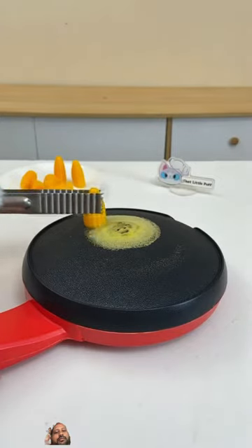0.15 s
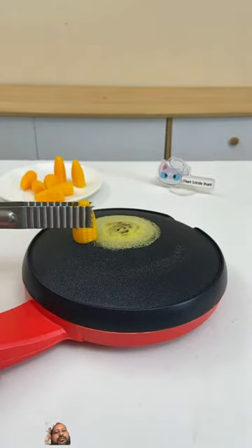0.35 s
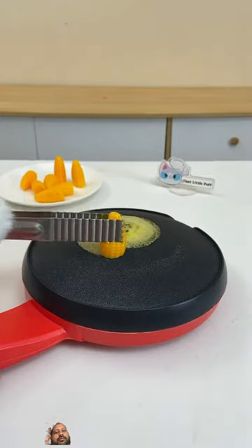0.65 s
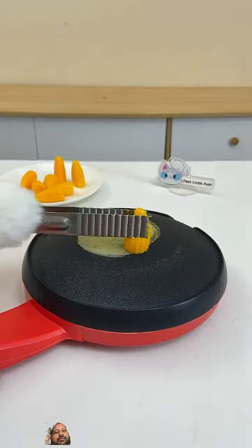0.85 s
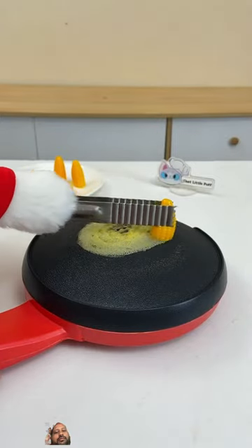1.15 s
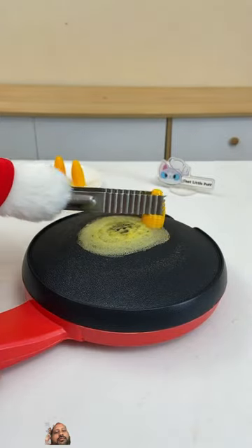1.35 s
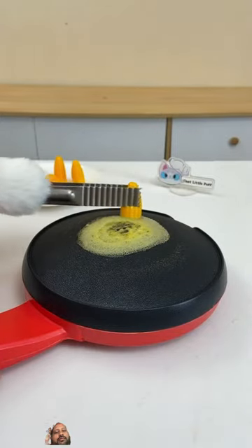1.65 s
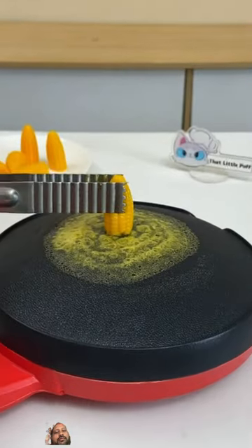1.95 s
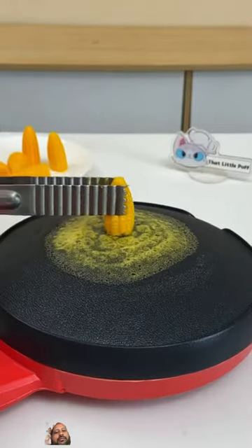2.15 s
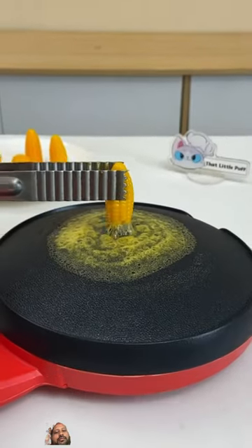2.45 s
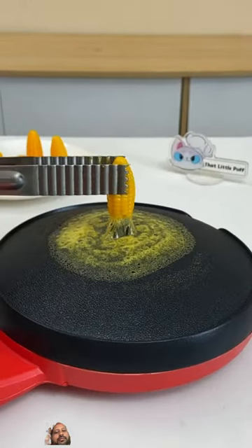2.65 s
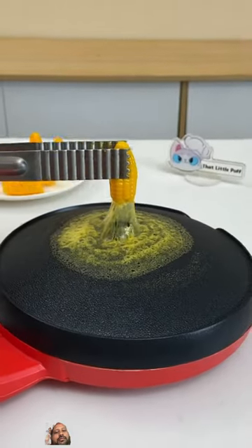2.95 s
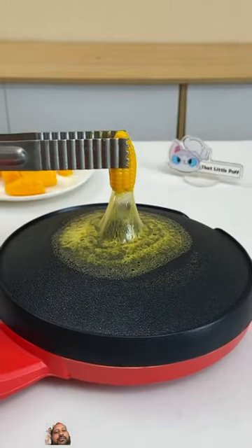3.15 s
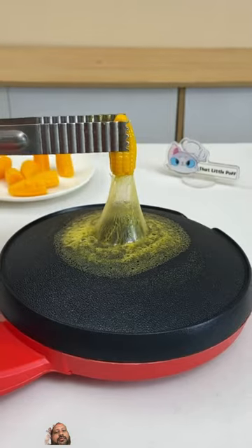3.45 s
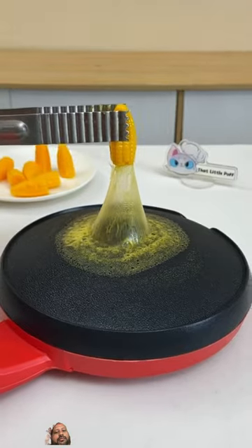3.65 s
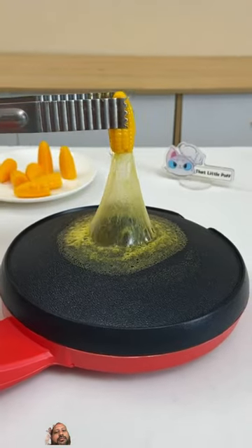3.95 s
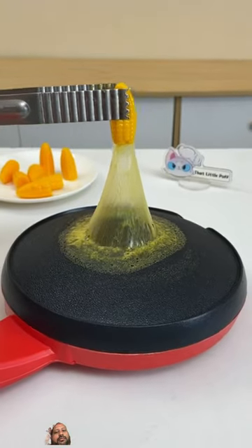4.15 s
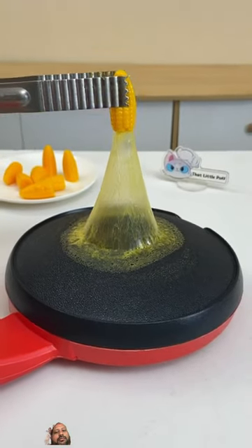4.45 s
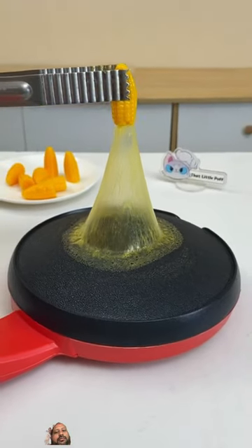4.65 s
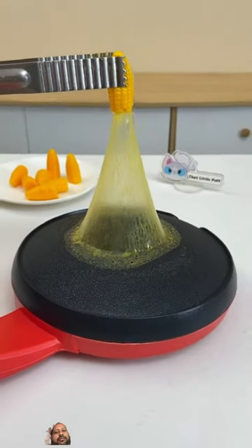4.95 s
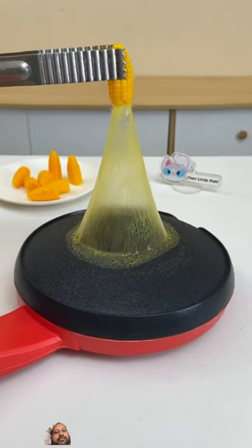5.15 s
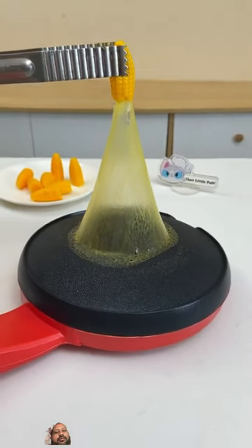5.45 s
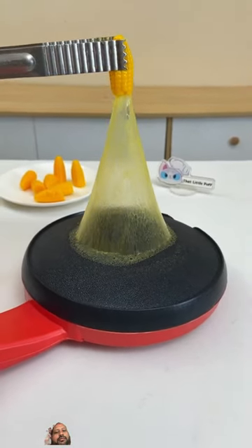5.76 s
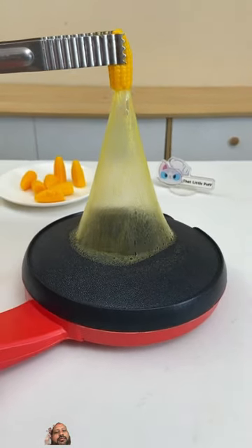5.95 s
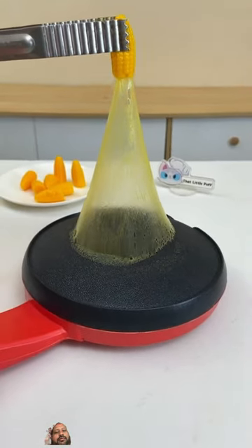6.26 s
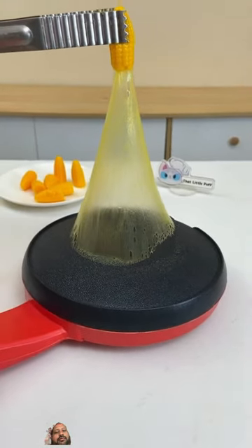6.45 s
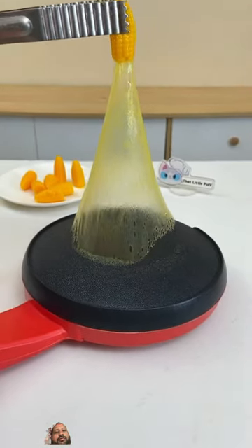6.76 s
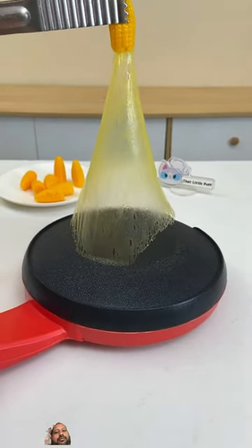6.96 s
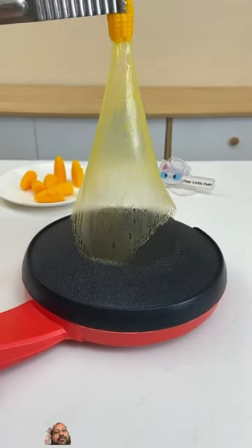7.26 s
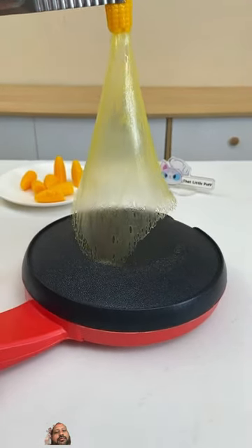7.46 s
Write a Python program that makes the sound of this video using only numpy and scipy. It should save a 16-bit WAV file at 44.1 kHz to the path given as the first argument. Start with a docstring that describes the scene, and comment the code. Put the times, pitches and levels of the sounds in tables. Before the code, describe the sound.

Close over a hot electric plate in a kitchen, thin batter hisses brightly, full of small popping bubbles and early steam, easing as it dries, then stops dead. After a brief silence come faint room air, a soft wet plop and one hard snap. The cooked film then peels away in quiet, dry, rustling surges with single sharp cracks, a faint squeak and a short low hum near the end.

```python
"""In a kitchen, close over a hot electric plate: thin batter hisses, full of bursting bubbles, and stops dead.
After a moment of silence come room air, a soft plop and a sharp snap. Then the cooked film is pulled up:
it peels in rustling surges of tiny fractures, with single dry cracks; its hollow note sinks as the cone grows.
Noise grains, filtered to each colour, make hiss and rustle; struck resonances make bubbles, snap and flaps.
The stretched skin squeaks once; late on, a double tug sets it humming. A faint floor lies underneath."""
import sys
import numpy as np
from scipy import signal
from scipy.fft import rfft, irfft
from scipy.io import wavfile
from scipy.ndimage import uniform_filter1d, map_coordinates

SR = 44100
rng = np.random.default_rng(int(sys.argv[2]) if len(sys.argv) > 2 else 0)


def dump(signal):
    """Clip the signal to [-1, 1] and save it as 16-bit WAV at the path in sys.argv[1]."""
    limited = np.clip(np.atleast_2d(signal).T, -1, 1)
    pcm = np.round(limited * 32767).astype(np.int16)
    wavfile.write(sys.argv[1], SR, pcm)


N = 335160
TIME = np.arange(N) / SR

# Colour of the frying batter: f/Hz, level/dB per Hz
FRY_SPECTRUM = [(24, -76.5), (40, -17.5), (75, -17), (115, -18), (171, -9.5), (354, -16), (942, -18),
                (3140, -3.5), (9450, -5), (14500, -15), (16000, -28.5)]
# Loudest single cracks of the film: t/s, level/dB (over 2 ms), fizz re level/dB, body re level/dB
CRACKS = [(2.492, -46, -8, -19), (2.5741, -42, 16.5, -11.5), (2.6215, -58, 18, -12),
          (2.6366, -23.5, 4.5, -19), (2.7786, -47, 13.5, -8.5), (2.787, -45, 13.5, -13),
          (2.8088, -47, 9, -7), (2.8149, -47, 11, -12), (3.086, -46, 2, -6), (3.103, -38, 7.5, -24),
          (3.1074, -45, 7, -25), (3.1466, -40, 6, -25), (3.1605, -32, 5, -31), (3.168, -23, -1.5, -15),
          (3.3705, -30, 0.5, -20), (3.3745, -30.5, -0.5, -24), (3.4578, -33, 3, -19), (3.461, -36, 0, -25),
          (3.465, -32, 1, -34), (3.4851, -39, 7, -25), (3.4915, -38, 8, -22), (3.6113, -39.5, 5, -31),
          (3.619, -37, 3, -35), (3.6338, -44, 0, -25), (3.7095, -42, 1, -28), (3.7222, -40, 3.5, -28),
          (3.7484, -36, 2, -26), (3.8135, -31.5, -3, -23), (3.8196, -39, 1, -22), (3.829, -42, 5.5, -28),
          (3.9698, -40, 5.5, -19.5), (3.9853, -47, 0, -12), (4.109, -41.5, 2, -22),
          (4.1367, -35.5, -9, -6.5), (4.3, -42, 1.5, -24), (4.936, -29.5, 1, -23), (5.6309, -44, -2, -19),
          (5.6538, -38.5, 0, -19), (5.6815, -37.5, -16, -6.5), (5.7304, -40, -5, -37),
          (5.743, -44, -3, -25), (5.76, -39.5, -15, -31), (5.821, -44.5, -1, -28), (5.843, -42, 2.5, -21),
          (5.8659, -35.5, -12, -27), (5.9502, -47, -9, -25), (6.1426, -45, 1, -28), (6.2271, -37, -3, -21),
          (6.353, -38, -0.5, -22), (6.387, -33.5, -5, -16), (6.4807, -29.5, 2.5, -21),
          (6.517, -33, -7, -24), (6.5476, -39, -5, -22), (6.8232, -49, 8, -13.5), (6.915, -38, 0.5, -18),
          (6.932, -40.5, 7, -25), (6.9497, -38, 8, -27), (7.0874, -39.5, 1, -18), (7.1645, -32.5, -1, -15),
          (7.1812, -39, -3, -14), (7.4236, -39, -5, -17), (7.4848, -46.5, -1, -13),
          (7.5522, -33, -4.5, -16)]
# Hollow note of the lifted film, sinking as the cone grows: t/s, f/Hz
FILM_NOTE = [(2.8, 650), (3.8, 655), (5.6, 651), (6.25, 423), (7.05, 423), (7.16, 365)]
# Main colour of the film's fractures: f/Hz, level/dB per Hz
TEAR_SPECTRUM = [(1200, -48.5), (1800, -17), (2350, 0.5), (3300, 0), (5000, -0.5), (6500, -2.5),
                 (9000, -30.5)]
# Top colour of the film's fractures: f/Hz, level/dB per Hz
FIZZ_SPECTRUM = [(3500, -28), (5500, -3), (7000, 3.5), (9500, 3.5), (12000, 0.5), (13500, -7), (14700, -43),
                 (16000, -80)]
# Low, hollow colour of the film's fractures: f/Hz, level/dB per Hz
BODY_SPECTRUM = [(80, -39.5), (190, -7), (520, -1.5), (1100, -3), (1700, -15), (4000, -40)]

AIR_START_S, PEEL_START_S = 2.124, 2.48
FIRST_PULL_END_S, PULL_PERIOD_S = 4.1, 1.545
SURGE_RISE_DB_PER_S, SURGE_RELEASE_DB_PER_S = 1145, 344


def frying():
    """Hiss, bubbles and steam of wet batter on hot metal, which stop dead together."""
    stop_s = 1.943
    return band(sizzle() + popping() + steam(), 45, 20000) * (TIME < stop_s)


def sizzle(count=22):
    """Tiny bursts merge into a hiss; larger bubbles ring for a few cycles in clusters; spat droplets add ticks."""
    # The hiss flares as the batter spreads, eases as it dries, and fades once the water is gone
    start_db, drying_db_per_s = -36.0, 1.5
    flare_s, flare_width_s, flare_db = 0.12, 0.11, 2.5
    flare = flare_db * np.exp(-((TIME - flare_s) / flare_width_s) ** 2)
    level_db = start_db + flare - drying_db_per_s * TIME + water_gone_db()

    fine = colour(grains(per_s=10000, spread_db=2.6), FRY_SPECTRUM)
    pitches_hz = np.geomspace(2850, 10500, count)
    bubbles = rms_one(sum(bubble(grains(per_s=55, spread_db=2.8), hz, cycles=10.0) * hz ** -.2
                          for hz in pitches_hz))
    clusters = from_db(1.4 * drift(110) + 1.3 * drift(20))
    spits = rms_one(colour(grains(per_s=520, spread_db=4.0), FRY_SPECTRUM))
    mix = from_db(-3.2) * fine + from_db(-2.0) * clusters * bubbles + from_db(-6.8) * spits
    return from_db(level_db) * mix


def popping():
    """The largest bubbles burst: a skin tears with a broad tick, rings briefly and knocks on the plate."""
    # Largest bubbles: t/s, level/dB, f/Hz
    big_bubbles = [(0.1835, -20.5, 3030), (0.2937, -19, 3400), (0.5403, -16, 3300), (0.617, -24, 2600),
                   (0.6843, -20, 5400), (0.7675, -18, 4750), (0.8185, -21, 8000), (0.8377, -22.5, 2900),
                   (0.8827, -21, 2460), (0.9106, -18.5, 3800), (0.9651, -17, 6450), (1.0018, -15.5, 4400),
                   (1.0048, -15, 3050), (1.0316, -18, 3250), (1.144, -16.5, 4640), (1.2492, -19.5, 3350),
                   (1.3801, -15, 3050), (1.453, -20, 5370), (1.5205, -20, 3100), (1.5305, -17.5, 2900),
                   (1.531, -20, 4900), (1.6304, -23.5, 3060), (1.6489, -21, 2850), (1.7105, -18.5, 4180),
                   (1.7962, -20.5, 2630), (1.8125, -24.5, 4100), (1.8614, -26.5, 4000), (1.875, -29, 3800)]
    s, db, _ = np.transpose(big_bubbles)
    rings = sum(bubble(clicks([at], from_db(level_db + 1.5)), hz, cycles=13.2)
                for at, level_db, hz in big_bubbles)
    ticks = colour(clicks(s, from_db(db - 5.0)), FRY_SPECTRUM)
    knocks = band(clicks(s, from_db(db + 1.5)), 500, 2200)
    return rings + ticks + knocks


def steam():
    """Dense high noise: steam jets out wide at first, then thins to a narrow wisp."""
    jet_db, wisp_db, jet_end_s, jet_fall_s = -46.5, -65.0, 0.47, 0.24
    level_db = np.interp(TIME, [jet_end_s, jet_end_s + jet_fall_s], [jet_db, wisp_db]) + water_gone_db()
    mid, side = [rms_one(band(grains(per_s=14000, spread_db=0.5), 11500, 17000, order=3)) for _ in range(2)]
    return from_db(level_db) * spread(mid, side, side_db=-3.5 + 0.96 * (level_db - jet_db))


def water_gone_db(dry_s=1.56, fade_db_per_s=20.5):
    """Fall of hiss and steam in dB once the water is gone."""
    return -fade_db_per_s * np.maximum(TIME - dry_s, 0)


def lifted_film():
    """Peeling, cracks and flaps of the sheet, whose first run of crinkles comes twice."""
    film = band(peeling() + cracking() + flapping(), 160, 20000, order=3)   # so light a sheet gives no bass
    first_run = film * (TIME < FIRST_PULL_END_S)
    film = film + np.roll(first_run, round(PULL_PERIOD_S * SR), axis=1)
    lean_db = np.interp(TIME, [2.5, 7.5], [.3, .9])   # drifts a little to the right
    return film * from_db(np.array([[-1], [1]]) * lean_db)


def peeling():
    """The film lets go in surges: fast peeling is a dense rush, and separate ticks stand out when it slows."""
    # Scratchy ring of the peeling edge: t/s, f/Hz
    edge_pitch = [(2.6, 9400), (2.88, 10300), (2.938, 8500), (3.176, 7700), (3.3, 11100), (3.354, 8800),
                  (3.548, 8600), (3.924, 10040)]
    tear_db, fizz_db, body_db = peeling_levels()
    edge_hz, = in_time(edge_pitch)
    film_hz, = in_time(FILM_NOTE)
    catch = from_db(1.51 * drift(320))   # the edge catches and slips
    ticks = grains(per_s=340, spread_db=3.1) * from_db(-.4 * np.maximum(tear_db + 52, 0))

    tear = rustle(TEAR_SPECTRUM, per_s=6000, spread_db=1.4, side_db=-4.5)
    tear = tear + from_db(-4.0) * colour(ticks, TEAR_SPECTRUM)
    tear = patchy(tear, depth_db=5.0, width_hz=240, rate=20)

    edge = hollow(rustle(FIZZ_SPECTRUM, per_s=14000, spread_db=1.6, side_db=-4), edge_hz, width_hz=1900)
    edge_db = 1.5 - 9 * np.maximum(TIME - 5.5, 0)   # fades by 9 dB/s from 5.5 s
    fizz = rustle(FIZZ_SPECTRUM, per_s=12000, spread_db=2.5, side_db=-0.5)
    fizz = fizz + from_db(-2.0) * colour(ticks, FIZZ_SPECTRUM) + from_db(edge_db) * edge
    fizz = patchy(fizz, depth_db=4.2, width_hz=300, rate=16)

    drive = grains(per_s=5000, spread_db=3.5) + from_db(-5.0) * ticks
    body = from_db(-3.0) * hollow(drive, film_hz, width_hz=390)
    body = body + from_db(-2.0) * rms_one(band(drive, 940, 1440))
    body = body + from_db(-5.0) * rustle(BODY_SPECTRUM, per_s=5000, spread_db=2.0, side_db=3.0)
    body = patchy(body, depth_db=5.5, width_hz=100, rate=14, size=1024)

    mix = from_db(tear_db + 1.5) * tear + from_db(fizz_db + 1.96) * fizz + from_db(body_db + .5) * body
    return catch * (TIME > PEEL_START_S) * mix


def peeling_levels(step_size=32):
    """Tear, fizz and body in dB before balance: surges and crack rustles add to a creep; all drop in a stall."""
    # Surges, each a patch of film letting go: t/s, length/s, tearing level/dB, fizz re tearing/dB
    surges = [(2.494, 0.007, -52, -8), (2.644, 0.076, -58.5, 15.5), (2.782, 0.12, -53.5, 13),
              (2.896, 0.12, -45.5, 2.5), (3.025, .025, -55.5, 0), (3.101, 0.043, -54, 5),
              (3.152, .008, -49, 12), (3.166, 0.009, -38.5, 1), (3.202, 0.056, -41, 5.5),
              (3.275, 0.044, -50, 8), (3.428, .025, -54, 4), (3.463, 0.082, -43, 7),
              (3.62, 0.063, -53.5, 2), (3.747, 0.017, -41, -1.5), (3.82, 0.02, -50, 1),
              (3.863, 0.17, -52.5, 1), (5.37, 0.022, -47.5, 0), (5.406, 0.036, -41, 6.5),
              (5.683, 0.046, -49, -3.5), (5.845, 0.042, -53.5, 3), (5.955, 0.15, -54, 1.5),
              (6.147, 0.05, -53, -1), (6.382, 0.085, -44, 1), (6.544, 0.065, -40, -6),
              (6.64, .052, -40, -13), (6.717, 0.037, -58.5, 5.5), (6.916, 0.018, -46, 1),
              (6.952, 0.038, -40.5, 6.5), (7.088, 0.024, -48.5, 2), (7.165, 0.18, -45, -2.5),
              (7.302, 0.12, -45, 3.5), (7.322, 0.003, -40, 4.5), (7.552, .05, -41.5, 0.5)]
    # The edge sticks: start t/s, end t/s (a row that ends before it starts is silent)
    stalls = [(2.518, 2.6), (2.752, 2.773), (2.793, 2.82), (3.596, 3.62), (4.072, 3.7), (5.927, 5.89),
              (6.495, 6.53)]
    t = TIME[::step_size]
    # Every crack comes wrapped in a brief rustle of smaller fractures: lead 2.3 ms, length 2.5 ms
    rustles = [(s - 0.0023, 0.0025, min(db - 16, -49), fizz_db) for s, db, fizz_db, _ in CRACKS]
    s, length, db, fizz_re_db = np.vstack([surges, rustles]).T[:, :, None]
    surge_db = db + swell(t - s, length, SURGE_RISE_DB_PER_S, 23.5, SURGE_RELEASE_DB_PER_S)

    stuck = sum(1. * (TIME > start) * (TIME < end) for start, end in stalls)
    stall_db = -6.5 * uniform_filter1d(stuck, size=200)

    # Between surges the edge only creeps; the repeated run brings its own creep
    creep_start_s, creep_tear_db, creep_fizz_db = 2.645, -64.5, -59
    second_run = (t > FIRST_PULL_END_S) & (t < FIRST_PULL_END_S + PULL_PERIOD_S)
    creep_db = swell(t - creep_start_s, N / SR, SURGE_RISE_DB_PER_S, 0, 0)
    creep_db = creep_db + uniform_filter1d(-20. * second_run, size=16)

    def total_db(rows_db, rest_db):
        """Power sum of surges and creep, lowered in stalls."""
        power = np.sum(from_db(rows_db) ** 2, axis=0) + from_db(creep_db + rest_db) ** 2
        return stall_db + np.interp(TIME, t, 10 * np.log10(power))

    tear_db = total_db(surge_db, creep_tear_db)
    fizz_db = total_db(surge_db + fizz_re_db, creep_fizz_db)
    # The hollow body follows the tearing, and gains 0.45 dB/s as the cone grows
    typical_tear_db, typical_body_db = -47.5, -68.5
    body_db = typical_body_db + 0.89 * (tear_db - typical_tear_db) + 0.45 * (TIME - PEEL_START_S)
    return tear_db, fizz_db, body_db


def cracking(lag_s=.00002, count=3):
    """Each crack is a sharp double kick into the film, with a few weaker splinters just behind it."""
    s, db, fizz_db, body_db = np.transpose(CRACKS)
    size = from_db(db) * np.sqrt(.002 * SR)   # energy of 2 ms in one kick
    splinter_s = s[:, None] + 0.015 * rng.random((len(s), count))
    splinter_share = from_db(-13.5) * rng.standard_normal((len(s), count))
    # The hardest cracks break clean, and their two steps lie closest together
    splinter_share = splinter_share * from_db(-.6 * np.maximum(db + 33, 0))[:, None]
    gap_s = np.where(db + fizz_db > -23, .00021, .0011 * rng.uniform(.4, 1.4, len(s)))
    second_share = .4   # of the energy

    def kicks(a):
        """First step, second step and splinters."""
        first = clicks(s, a * np.sqrt(1 - second_share))
        second = clicks(s + gap_s, a * np.sqrt(second_share))
        return first + second + clicks(splinter_s, a[:, None] * splinter_share)

    mid_kicks = kicks(size)
    top_kicks = kicks(size * from_db(fizz_db))
    crack = colour(mid_kicks, TEAR_SPECTRUM) + from_db(1.5) * colour(top_kicks, FIZZ_SPECTRUM)
    crack = crack + from_db(-17.5) * bubble(mid_kicks, 6150, cycles=6.1)
    crack = crack + from_db(-15.0) * bubble(top_kicks, 9300, cycles=18)
    crack = crack + from_db(-1.5) * colour(clicks(s, size * from_db(body_db)), BODY_SPECTRUM)
    ears = np.array([crack, np.interp(TIME - lag_s, TIME, crack)])   # a shade later on the right
    return ears + from_db(-14.0) * kitchen(crack, t60=0.013) + from_db(-16.0) * kitchen(crack, t60=0.3)


def flapping():
    """The tugged cone thumps at its hollow note: small it only thuds, tall it rings on with an overtone."""
    # Flaps as the cone is tugged free: t/s, level/dB
    flaps = [(3.168, -46.5), (3.752, -61.5), (3.815, -59), (5.684, -61.5), (6.548, -56.5), (6.665, -57),
             (6.912, -57.5), (6.995, -54.5), (7.088, -60), (7.162, -54), (7.548, -63)]
    # Balance as the cone grows: t/s, thud re flap/dB, overtone re flap/dB
    cone_growth = [(3, 14.5, -15), (7.5, 0, -1)]
    film_hz, = in_time(FILM_NOTE)
    thud_db, overtone_db = in_time(cone_growth)
    flap_t60_s, thud_t60_s = 0.17, 0.02
    decay = from_db(-60 / (flap_t60_s * SR))
    s, db = np.transpose(flaps)
    level = signal.lfilter([1], [1, -decay], clicks(s, from_db(db)) + 1e-18)
    level = uniform_filter1d(level, size=256)
    note = hollow(rng.standard_normal(N), film_hz, width_hz=125)
    overtone = hollow(rng.standard_normal(N), 2.38 * film_hz, width_hz=350)
    thuds = sum(ring(clicks([at], from_db(size_db)), np.interp(at, TIME, film_hz), thud_t60_s)
                for at, size_db in flaps)
    return from_db(thud_db) * band(thuds, 300, 1500) + level * (note + from_db(overtone_db) * overtone)


def film_hum():
    """A double tug thumps the taut film; it scuffs, hums as it slips, gliding up, then flutters roughly."""
    # The two tugs: t/s
    tugs_s = [7.3212, 7.3279]
    # Modes struck by the tugs: f/Hz, level/dB, t60/s
    tug_modes = [(284, -39, 0.05), (439, -36, 0.04), (1167, -38, 0.034)]
    length_s = 0.063
    age = TIME - 7.328
    pitch_hz = (334 + 260 * np.clip(age, 0, .15)) * (1 + .022 * drift(150))   # glides up at 260 Hz/s
    hum_db = -44 + swell(age, length_s, 2000, 0, 2200) + 1.1 * drift(110)
    hum = from_db(hum_db) * np.sin(2 * np.pi * np.cumsum(pitch_hz) / SR)

    thump = sum(ring(clicks(tugs_s, from_db(db)), hz, t60) for hz, db, t60 in tug_modes)
    thump = band(thump, 220, 1400)

    low, high = [hollow(rng.standard_normal(N), k * pitch_hz, width_hz=260) for k in (1, 3)]
    flutter_db = -57.5 + swell(age - length_s, 0.026, 300, 0, 450)
    flutter = from_db(flutter_db) * (low + high)

    scuff_db = -54.5 + swell(TIME - tugs_s[0], .018, 300, 0, 330)
    scuff = from_db(scuff_db) * rms_one(band(grains(per_s=900, spread_db=2.0), 300, 1350))   # over the plate
    return band(hum + thump + flutter + scuff, 200, 2000, order=3)


def squeak():
    """The stretched skin squeaks faintly as it drags along the plate: narrow noise at one pitch."""
    start_s, length_s, pitch_hz = 6.03, .09, 2900
    level_db = -56 + swell(TIME - start_s, length_s, SURGE_RISE_DB_PER_S, 0, SURGE_RELEASE_DB_PER_S)
    return from_db(level_db) * hollow(rng.standard_normal(N), np.full(N, pitch_hz), width_hz=380)


def snap():
    """One hard snap: a spike, a short splintering, a ring and a hissing tail."""
    # Colour of the snap: f/Hz, level/dB per Hz
    snap_spectrum = [(35, -49), (60, -19), (338, -20), (785, -8.5), (991, -4.5), (1170, -16), (1470, -3.5),
                     (2650, -12), (4530, -5), (5090, -6.5), (6900, 0), (13000, -14.5), (16000, -27.5)]
    # Ringing of the snap: f/Hz, level/dB, t60/s
    snap_modes = [(837, -22.5, 0.032), (957, -23.5, 0.033), (1510, -30, 0.034), (3430, -25.5, 0.047),
                  (5560, -33, 0.076), (7000, -37, .12)]
    start_s = 2.3785
    kick = clicks([start_s], 0.92)
    splinter, side_splinter = [from_db(-15.5) * burst(start_s, t60=0.042)
                               + from_db(-32.0) * burst(start_s, t60=0.27) for _ in range(2)]
    mid = colour(from_db(5.0) * kick + splinter, snap_spectrum)
    mid = mid + sum(ring(kick * from_db(db), hz, t60) for hz, db, t60 in snap_modes)
    side = band(colour(side_splinter, snap_spectrum), 3000, 14300)
    fade = np.interp(TIME, [2.47, 2.52], [1, 0])
    return fade * spread(mid, side, side_db=-10.5)


def plop():
    """A soft, wet plop: two resonances in a row make it swell over a few cycles."""
    note = ring(ring(clicks([2.1742], 1.0), 1320, 0.01), 1320, 0.0076)
    note = from_db(-23.0) * note / np.abs(note).max()
    return note + from_db(-9.0) * kitchen(note, t60=0.15)


def air():
    """Even room hiss around the snap, over a low rumble that differs at each ear."""
    # Colour of the room air: f/Hz, level/dB per Hz
    air_spectrum = [(12, -39), (20, -2.5), (377, -24), (410, -16.5), (1260, -18), (3440, -19), (6010, -21),
                    (9140, -19), (16000, -25.5)]
    end_s, release_db_per_s = 2.475, 2402
    level_db = -47 - release_db_per_s * np.clip(TIME - end_s, 0, .1)
    rumble = rms_one(band(rng.standard_normal(N), 20, 110))
    hiss = colour(rng.standard_normal(N), air_spectrum)
    return (TIME > AIR_START_S) * from_db(level_db) * spread(hiss, rumble, side_db=-11.5)


def background():
    """Faint steady noise that lies under the peeling, from the start of the room air."""
    # Colour of the faint floor: f/Hz, level/dB per Hz
    floor_spectrum = [(70, -27.5), (130, -15), (200, 3), (400, -2.5), (1500, -11.5), (4000, -23)]
    return from_db(-79.5) * colour(rng.standard_normal(N), floor_spectrum) * (TIME > AIR_START_S)


def from_db(db):
    """Decibels to gain."""
    return 10 ** (np.asarray(db) / 20)


def rms_one(x):
    """Scale to unit rms."""
    return x / np.sqrt(np.mean(x ** 2) + 1e-20)


def in_time(rows):
    """Each column of a curve, at every sample."""
    s, *columns = np.transpose(rows)
    return [np.interp(TIME, s, c) for c in columns]


def drift(rate):
    """Smooth chance of rms 1, changing about rate times a second."""
    knots = rng.standard_normal(8192)
    return rms_one(np.interp(TIME * rate, np.arange(len(knots)), knots))


def colour(x, spectrum, size=4096):
    """Causal minimum-phase filter of unit energy with the given spectrum."""
    hz, db = np.transpose(spectrum)
    log_hz = np.log(np.maximum(np.fft.rfftfreq(size, 1 / SR), 1))
    cepstrum = irfft(np.log(from_db(np.interp(log_hz, np.log(hz), db))))
    cepstrum[1:size // 2] *= 2   # fold onto positive time
    cepstrum[size // 2 + 1:] = 0
    pulse = irfft(np.exp(rfft(cepstrum)))
    return signal.oaconvolve(x, pulse / np.linalg.norm(pulse))[:N]


def band(x, low_hz, high_hz, order=2):
    """Butterworth band-pass."""
    edges_hz = [low_hz, min(high_hz, SR / 2 - 1)]
    return signal.sosfilt(signal.butter(order, edges_hz, "band", fs=SR, output="sos"), x + 1e-18)


def ring(x, hz, t60):
    """A unit click sets a sine of starting height 1 ringing."""
    r, w = from_db(-60 / (t60 * SR)), 2 * np.pi * hz / SR
    return signal.lfilter([0, np.sin(w)], [1, -2 * r * np.cos(w), r * r], x + 1e-18)


def bubble(x, hz, cycles):
    """A burst bubble: a few cycles of one pitch, with no bass."""
    return band(ring(x, hz, cycles / hz), 0.43 * hz, 3 * hz)


def clicks(times, sizes):
    """Single-sample kicks."""
    out = np.zeros(N)
    places = np.round(np.asarray(times) * SR).astype(int)
    np.add.at(out, np.clip(places, 0, N - 1), sizes)
    return out


def grains(per_s, spread_db):
    """Random kicks, many small and a few large; rms 1."""
    sizes = from_db(spread_db * np.minimum(rng.exponential(1, N), 4.5)) * rng.choice([-1, 1], N)
    return rms_one(sizes * (rng.random(N) < per_s / SR))


def burst(start, t60):
    """Noise that starts at once and dies away."""
    age = TIME - start
    return rng.standard_normal(N) * (age >= 0) * from_db(-60 * np.maximum(age, 0) / t60)


def rustle(spectrum, per_s, spread_db, side_db):
    """Dense fractures along the peeling edge, partly different at each ear."""
    left, right, shared = [colour(grains(per_s, spread_db), spectrum) for _ in range(3)]
    return spread(shared, (left - right) / np.sqrt(2), side_db)


def hollow(x, note_hz, width_hz):
    """A resonance with a moving centre, filtered around zero after turning the note down there; rms 1."""
    turn = np.exp(2j * np.pi * np.cumsum(note_hz) / SR)
    sos = signal.butter(2, width_hz / 2, fs=SR, output="sos")
    return rms_one((turn * signal.sosfilt(sos, x / turn)).real)


def patchy(x, depth_db, width_hz, rate, size=512):
    """Small areas ring at their own pitches, which swell and fade by chance; rms 1."""
    hz, s, cells = signal.stft(x, SR, nperseg=size)
    places = np.meshgrid(hz / width_hz, s * rate, indexing="ij")
    field = map_coordinates(rng.standard_normal((96, 256)), places, order=1, mode="wrap")
    return rms_one(signal.istft(cells * from_db(depth_db * field), SR)[1][..., :N])


def swell(age, length, rise_db_per_s, sag_db_per_s, release_db_per_s):
    """Attack, sagging hold and release, in dB below the top."""
    fall = rise_db_per_s * np.maximum(-age, 0)
    fall = fall + sag_db_per_s * np.clip(age, 0, length)
    fall = fall + release_db_per_s * np.maximum(age - length, 0)
    return -np.minimum(fall, 200)


def spread(mid, side, side_db):
    """Left and right from a middle and a side part."""
    return mid + from_db(side_db) * side * np.array([[1], [-1]])


def kitchen(x, t60, size=16384):
    """Diffuse reflections, different at each ear, scaled to unit energy on the left."""
    age = np.arange(size) / SR
    tail = rng.standard_normal((2, size)) * from_db(-60 * age / t60) * (age > .002)
    return signal.oaconvolve(x[None], tail / np.linalg.norm(tail[0]), axes=1)[:, :N]


def scene():
    """Frying, the pause with its plop and snap, then the lifted film, over the background."""
    film = lifted_film() + film_hum() + squeak()
    return frying() + film + snap() + plop() + air() + background()


def record(dry):
    """At the microphone full scale limits the peaks, and a steep low-pass cuts the top at 16 kHz."""
    low_pass = signal.ellip(10, .1, 80, 16000, fs=SR, output="sos")
    return signal.sosfilt(low_pass, np.clip(dry, -1, 1))


dry = scene()
out = record(dry)
dump(out)
```